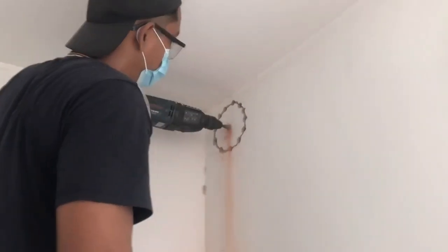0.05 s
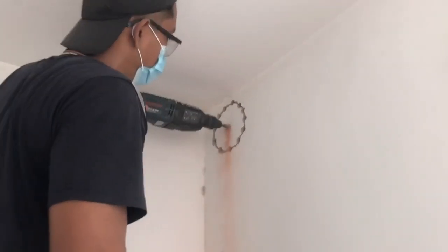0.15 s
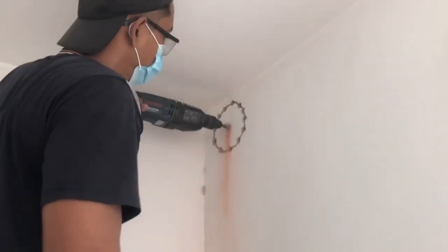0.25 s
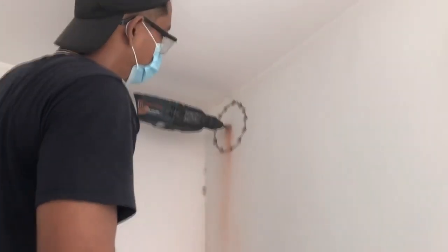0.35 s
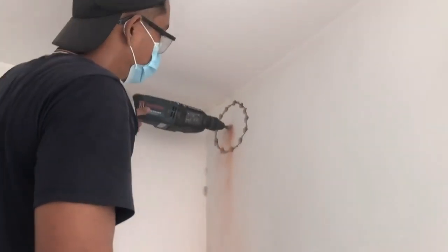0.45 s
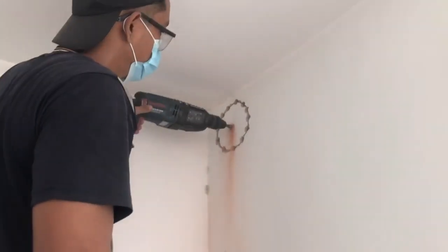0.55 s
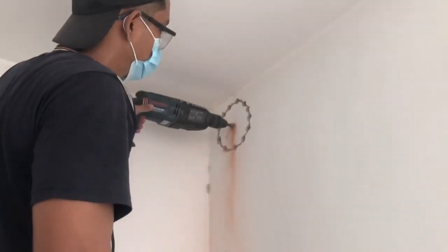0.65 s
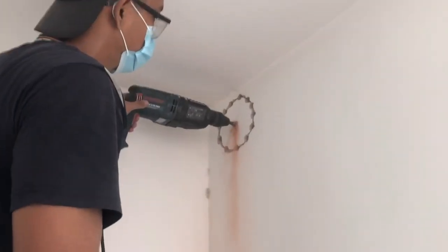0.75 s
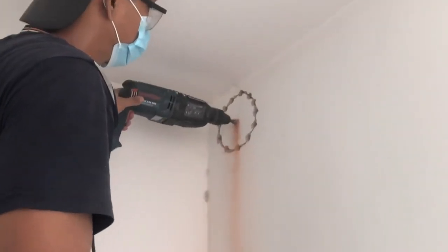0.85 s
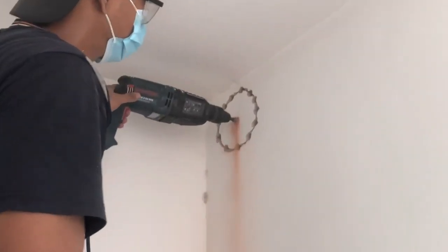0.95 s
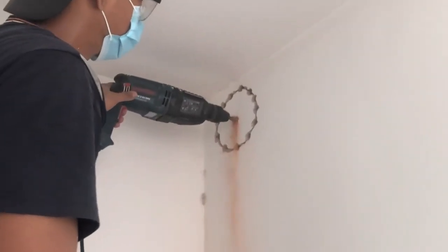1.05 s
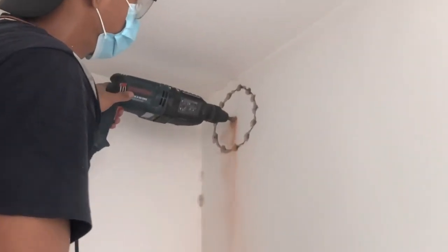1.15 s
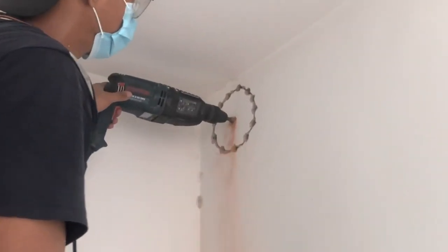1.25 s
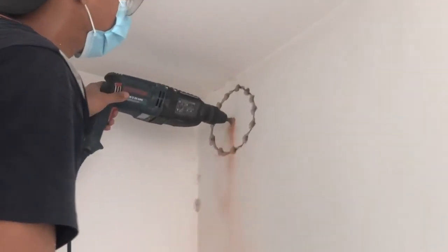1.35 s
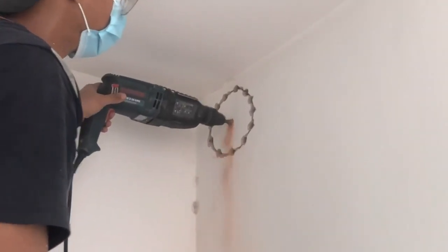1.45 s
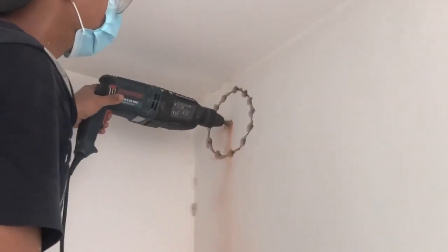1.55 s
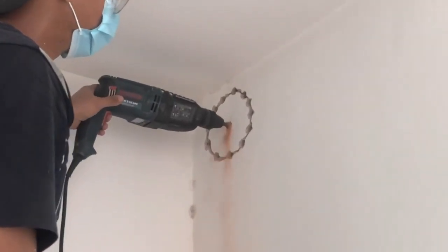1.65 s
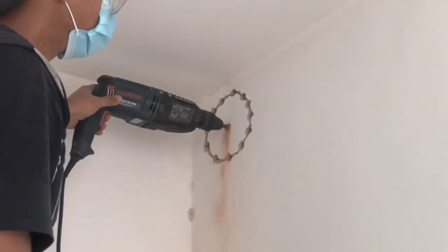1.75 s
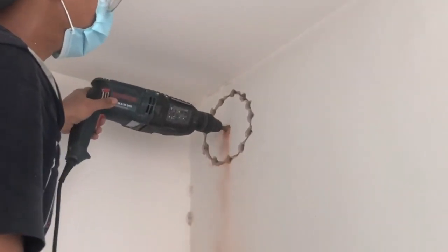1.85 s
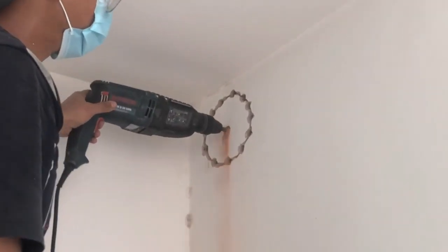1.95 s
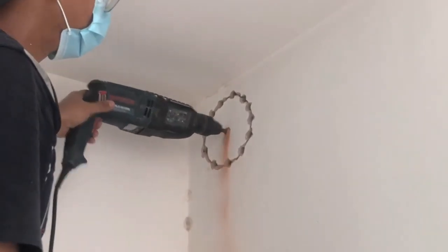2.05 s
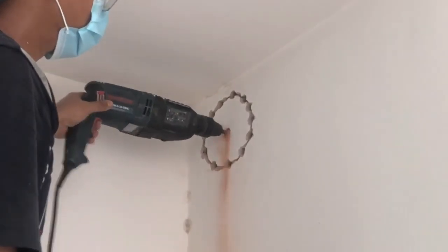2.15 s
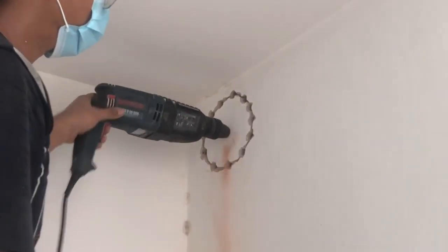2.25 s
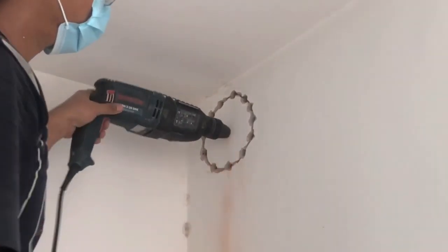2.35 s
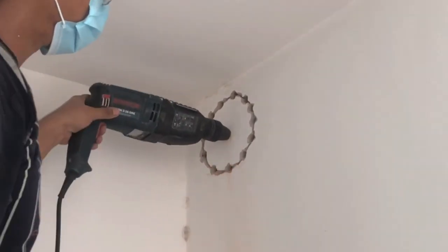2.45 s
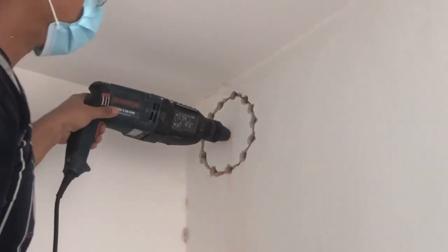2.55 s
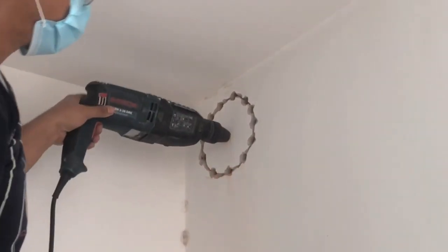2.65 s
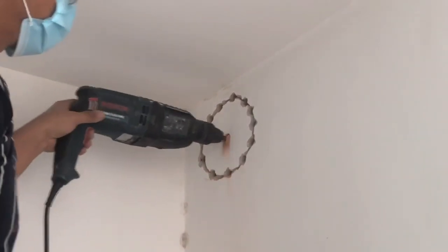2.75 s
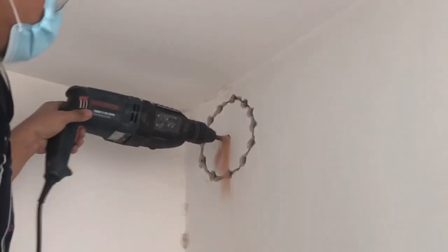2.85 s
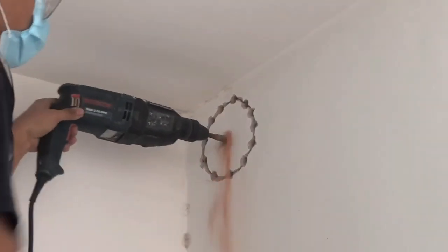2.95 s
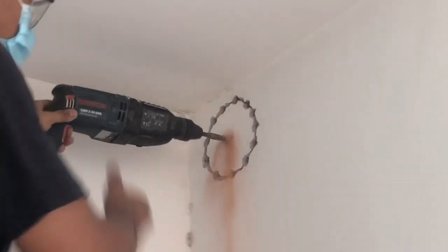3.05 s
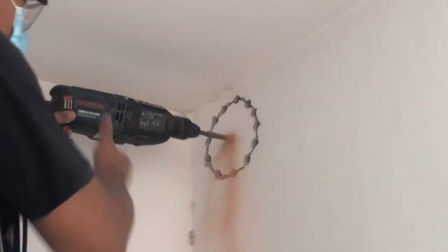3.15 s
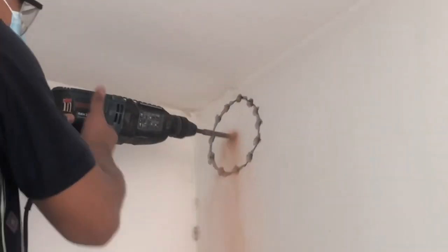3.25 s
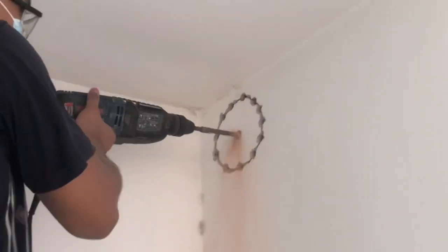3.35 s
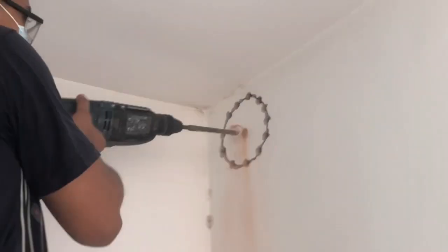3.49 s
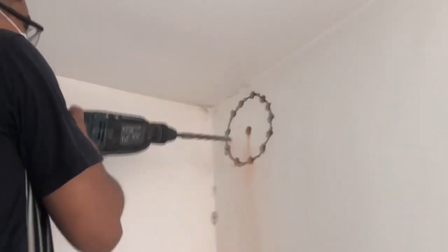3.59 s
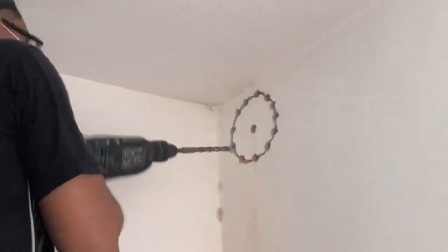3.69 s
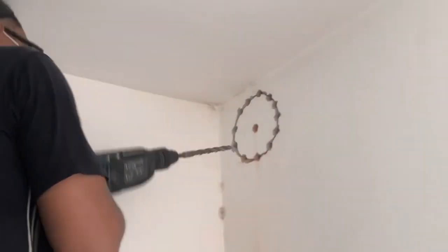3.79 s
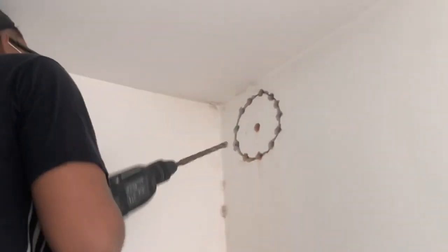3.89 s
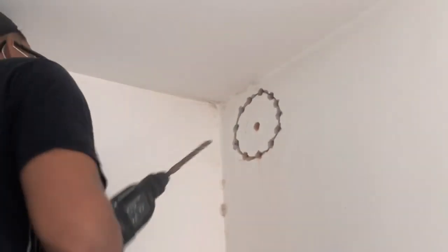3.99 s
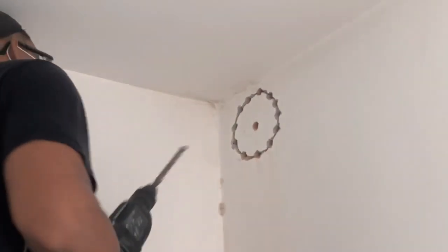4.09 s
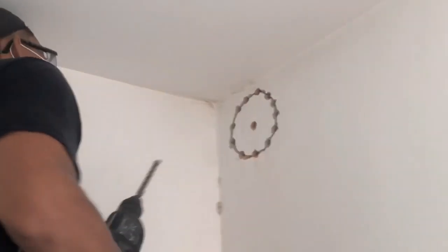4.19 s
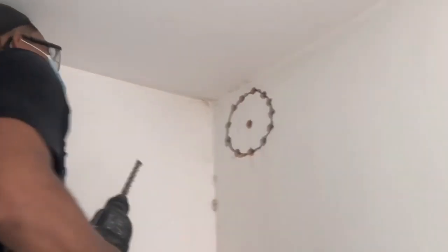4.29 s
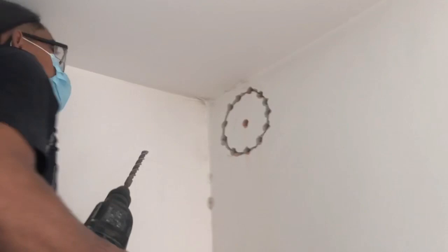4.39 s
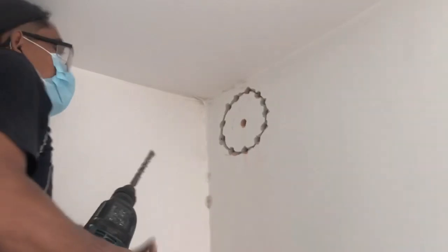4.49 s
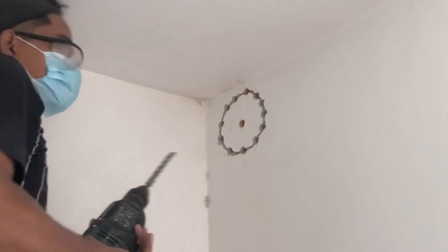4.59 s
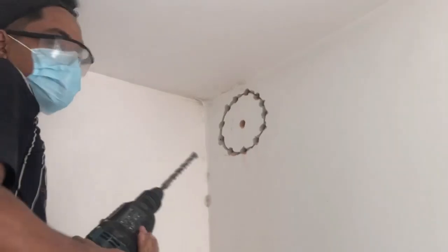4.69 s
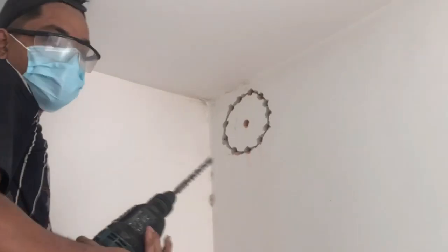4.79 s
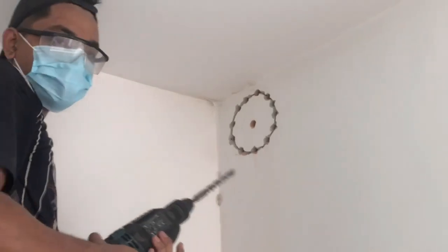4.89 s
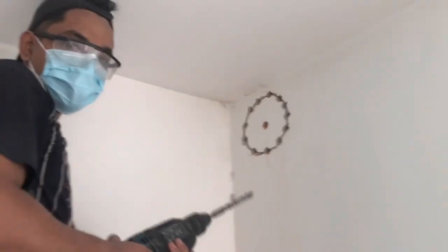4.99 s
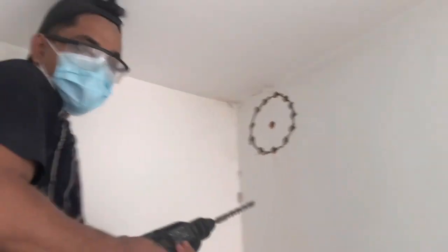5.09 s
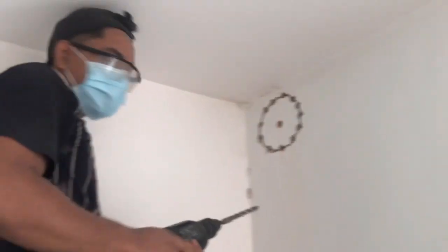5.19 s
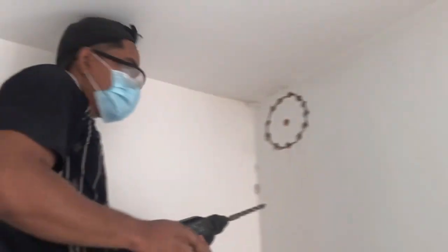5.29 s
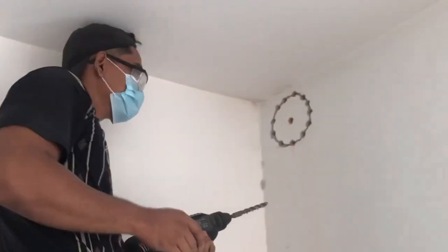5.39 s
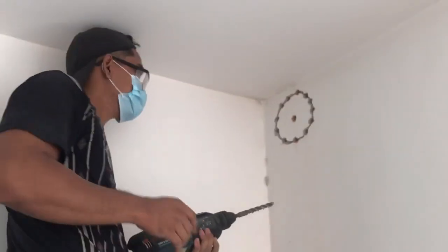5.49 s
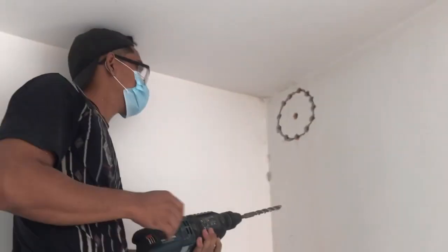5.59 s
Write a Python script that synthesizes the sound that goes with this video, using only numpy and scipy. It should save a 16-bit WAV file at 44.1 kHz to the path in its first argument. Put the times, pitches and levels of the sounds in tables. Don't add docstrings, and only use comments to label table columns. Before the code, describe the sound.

Loud, gritty hammer drilling from the start, about seventy blows a second, with booming wall and ringing steel. After two seconds the roar gives way to a smoother, higher motor whirr and brief scraping. The pitch then falls, the loose bit jingles and gears knock irregularly until they stop. Quiet clothing movement and one dull step follow in a hard-walled room, heard in mono at close to middle distance.

```python
import sys
import numpy as np
from scipy import signal
from scipy.fft import rfft, irfft, next_fast_len
from scipy.io import wavfile
from scipy.ndimage import uniform_filter1d

SR = 44100
rng = np.random.default_rng(int(sys.argv[2]) if len(sys.argv) > 2 else 0)


def magnitude_from_level(level_db):
    exponent = np.asarray(level_db, float) / 20
    return 10 ** exponent


def transcribe(u):
    v = np.clip(np.atleast_2d(u).T, -1, 1)
    q = np.round(v * 32767).astype(np.int16)
    wavfile.write(sys.argv[1], SR, q)


N = 248503

FIRST_BIND_S, THROUGH_S = 1.15, 2.13
RELEASE_S, STALL_S = 3.2, 4.78
LET_GO_S = 0.022
CASE_LOW_HZ = 600


def rms_one(x):
    return x / np.sqrt(np.mean(x ** 2) + 1e-20)


def after(start_s):
    return np.maximum(np.arange(N) / SR - start_s, 0)


def ramp(start_s, length_s):
    return np.clip(after(start_s) / length_s, 0, 1)


def spell(start_s, end_s):
    edge_s = .04
    return ramp(start_s, edge_s) * (1 - ramp(end_s - edge_s, edge_s))


def in_time(rows):
    s, *columns = np.transpose(rows)
    return [np.interp(np.arange(N) / SR, s, c) for c in columns]


def drift(rate):
    r = np.exp(-64 * np.pi * rate / SR)
    slow = signal.lfilter([1], [1, -2 * r, r * r], rng.standard_normal(N // 32 + 2002))[2000:]
    return np.interp(np.arange(N) / 32, np.arange(len(slow)), rms_one(slow))


def coloured(spectrum):
    hz, db = np.transpose(spectrum)
    size = next_fast_len(N)
    grid = np.maximum(np.arange(size // 2 + 1) * SR / size, 1)
    shape_db = np.interp(np.log(grid), np.log(hz), db, left=-70, right=-70)
    return rms_one(irfft(rfft(rng.standard_normal(size)) * magnitude_from_level(shape_db), size)[:N])


def ring(clicks, hz, t60):
    r, w = magnitude_from_level(-60 / (t60 * SR)), 2 * np.pi * hz / SR
    return signal.lfilter([0, np.sin(w)], [1, -2 * r * np.cos(w), r * r], clicks + 1e-18)


def fade(clicks, t60):
    return signal.lfilter([1], [1, -magnitude_from_level(-60 / (t60 * SR))], clicks + 1e-18)


def clicks_at(seconds, db):
    out = np.zeros(N)
    out[np.round(np.asarray(seconds) * SR).astype(int)] = magnitude_from_level(db)
    return out


def swelling(x, t60):
    swell = magnitude_from_level(-60 / (t60 * SR))
    return signal.lfilter([1 - swell], [1, -swell], x)


def jarring(seconds, db, t60):
    return swelling(fade(clicks_at(seconds, db), t60), .006) * rng.standard_normal(N)


def highpass(x, order, hz):
    return signal.sosfilt(signal.butter(order, hz, "high", fs=SR, output="sos"), x)


# time_s, crank_turns_hz
SPEED = [(0, 65), (.19, 68.8), (1.12, 69.7), (1.3, 58.9), (1.45, 57.1), (1.59, 66.4), (1.75, 67.8),
         (1.87, 59.9), (1.92, 61.5), (2.01, 66.6), (2.16, 67.6), (2.27, 74.5), (2.38, 78), (2.5, 80.6),
         (2.75, 82.3), (3.0, 81.5), (3.18, 80.9), (3.39, 66.3)]


def speed():
    last_s, last_hz = SPEED[-1]
    drag_hz = 44
    angle = np.arctan(last_hz / drag_hz) - .623 * after(last_s)
    coast = drag_hz * np.tan(np.maximum(angle, .02))
    return np.where(after(last_s) > 0, coast, in_time(SPEED)[0])


def crank():
    return np.cumsum(speed() * (1 + .002 * drift(15))) / SR


def loudness(db, power):
    return magnitude_from_level(db - 135 * after(STALL_S)) * (speed() / 82) ** power


def wavering(cycles, orders, wobble, flicker):
    n = len(cycles)
    total = 0
    for k, db in orders:
        level = magnitude_from_level(db) * (1 + flicker * drift(7)[:n]) * np.sqrt(2)
        total = total + level * np.sin(2 * np.pi * k * cycles + wobble * drift(12)[:n] + 7 * rng.random())
    return total


# pitch_hz, level_db per Hz
QUIET = [(35, -57.5), (60, -24.5), (108, -8.5), (154, -13.5), (190, -19.5), (290, -17), (615, -22.5),
         (4030, -32), (14700, -48), (16500, -53)]


def floor():
    again_s = 5.44
    moving = np.clip(1 - after(5.22) / 0.12, .12, 1)
    moving = moving + 0.58 * ramp(again_s - .04, 0.032) * magnitude_from_level(-25 * after(again_s))
    rustle = (after(4.9) > 0) * moving * magnitude_from_level(-59 + 2.0 * drift(24))
    rustle = rustle * coloured([(1500, -1), (4000, 0.5), (16000, -9.5)])
    return magnitude_from_level(-56 + 1.0 * drift(5)) * coloured(QUIET) + rustle


def boom(turns):
    boom_hz, t60_s, width_hz = 66.6, 0.51, 4
    noise = rms_one(ring(ring(rng.standard_normal(N), boom_hz, t60_s), boom_hz, t60_s))
    near = 1 / (1 + ((speed() - boom_hz) / width_hz) ** 2) ** .5
    driven_gain = magnitude_from_level(-43.5 + 1.5 * drift(4) - 33 * after(THROUGH_S))
    driven = driven_gain * near * 1.42 * np.sin(2 * np.pi * turns)
    return driven + np.hypot(loudness(-52, 3.0), magnitude_from_level(-66)) * noise


# start_s, peak_db
THUD = [
    (5.441, -37),
]
# pitch_hz, level_db, t60_s
BOARDS = [(75, -9, 0.46), (146, -5, 0.36), (235, 2, 0.56), (315, 2, .15)]


def footfall():
    step = clicks_at(*np.transpose(THUD))
    shake = step + magnitude_from_level(-30) * fade(step, 0.63) * rng.standard_normal(N)
    return sum(magnitude_from_level(db - 13.0) * ring(shake, hz, t60) for hz, db, t60 in BOARDS)


# start_s, peak_db, brightness_db
CLACKS = [(3.9, -9.5, -16), (3.989, -23, -2), (4.129, -13, -18), (4.392, -8, -25), (4.453, -3.5, -19),
          (4.527, -8, -22), (4.615, -3.5, -20.5), (4.644, -9, -22), (4.737, -2.5, -26), (4.778, -14.5, -38),
          (4.855, -18.5, -25), (4.956, -38, -12), (5.012, -29, -20), (5.064, -28.5, -22),
          (5.1134, -30.5, -19)]
# pitch_hz, level_db, t60_s
CASE = [(820, -8, .1), (1330, -9, .07), (1690, -1, .1), (1770, 0, .1), (2250, -6, .05), (2900, -5, .06),
        (3150, -5, .1), (4150, -10, .04), (5000, -14, .04)]


def clacks():
    s, db, bright_db = np.transpose(CLACKS)
    chance = rng.normal(0, 2, (len(s), len(CASE)))
    body = 0
    for k, (hz, mode_db, t60) in enumerate(CASE):
        jar = jarring(s, db - 33.5 + mode_db + chance[:, k], 0.064)
        body = body + ring(jar, hz, .24 * t60)
    puff = uniform_filter1d(fade(clicks_at(s + 0.00057, db - 10.5), 0.026), size=90)
    puff = puff * coloured([(900, -9), (2000, 1.5), (6000, -7.5)])
    crack = fade(clicks_at(s, db + bright_db), 0.048) * coloured([(5500, -7), (8500, 4), (11000, -1)])
    return highpass(body + puff, 4, CASE_LOW_HZ) + crack


# start_s, peak_db, struck_near_tip_db
RATTLE = [(3.6516, -16, 0), (3.674, -16, -11), (3.7181, -22, -16), (3.7428, -23, -14), (3.7666, -12, -4),
          (3.7918, -20, -11), (3.8432, -13, -21), (3.9275, -28, -6), (3.9589, -20, -12), (4.0217, -24, -4),
          (4.13, -6, -16), (4.2158, -21, 1), (4.361, -14.5, -2), (4.4215, -11.5, -2), (4.4761, -17, -7),
          (4.498, -23.5, 8), (4.575, -24, -1), (4.6149, -39.5, -13), (4.6473, -41, -3), (4.684, -19, -10)]
# pitch_hz, level_db, t60_s
BIT = [(4850, -11, .12), (7570, -10, .08), (7910, -10, .11), (9100, -14, .03), (11250, -5, .04),
       (11450, -1, .1), (11750, -2, .07), (12100, -3, .03), (12650, -5, .03), (15000, -4, .03),
       (15250, -1, .05), (15550, -3, .04)]


def rattle():
    s, db, low_db = np.transpose(RATTLE)
    chance = rng.normal(0, 1.5, (len(s), len(BIT)))
    out = 0
    for k, (hz, mode_db, t60) in enumerate(BIT):
        share_db = 0
        if hz < 10000:
            share_db = low_db + 8.5 + 3 * (hz < 5000)
        elif hz > 14000:
            share_db = -2
        jar = jarring(s, db - 32.5 + mode_db + share_db + chance[:, k], 0.12)
        out = out + ring(jar, hz, t60 / 2)
    return out + fade(clicks_at(s, db - 4.5), 0.019) * coloured([(4000, 4), (12000, -3), (16500, 6)])


# start_s, peak_db
PISTON = [(3.584, -16), (3.607, -13), (3.629, -33), (3.65, -21), (3.696, -32), (3.71, -16.5), (3.735, -15),
          (3.76, -21), (3.783, -32), (3.811, -25), (3.84, -32), (3.865, -16), (3.926, -16), (3.951, -18),
          (4.019, -25), (4.03, -32), (4.054, -24), (4.098, -18), (4.177, -16.5), (4.216, -17), (4.248, -19),
          (4.279, -19), (4.296, -21), (4.331, -19), (4.351, -17), (4.42, -18), (4.548, -19.5), (4.59, -29),
          (4.677, -24), (4.7, -35), (4.763, -33), (4.802, -38)]
# pitch_hz, level_db per Hz
KNOCK = [(500, -22), (800, 11), (1350, 5), (2800, 8), (5000, -3), (9000, -6), (16000, -22)]


def piston():
    return swelling(fade(clicks_at(*np.transpose(PISTON)), 0.055), .012) * coloured(KNOCK)


# pitch_hz, level_db, t60_s
FLUTES = [(737, -11, .05), (1150, -12, 0.083), (1546, 1, 0.064), (2120, 5.5, .03), (2470, -2, 0.023),
          (2770, -4, 0.044)]


def scraping():
    grit = rng.standard_normal(N)
    flutes = 0
    for hz, db, t60 in FLUTES:
        flutes = flutes + magnitude_from_level(db + 4.7 * drift(14.0)) * ring(grit, hz, t60) / np.sqrt(t60)
    song = magnitude_from_level(-44) * spell(THROUGH_S, RELEASE_S) * rms_one(ring(grit, 15480, .1))
    return magnitude_from_level(-21) * spell(2.6, 3.42) * rms_one(flutes) + song


def line_gain(loaded_db, free_db, sag_db, drop_db, power):
    settled_s = 2.48
    freed = 1 - np.exp(-after(THROUGH_S) / .11)
    sag_s = np.minimum(after(settled_s), RELEASE_S - settled_s)
    db = loaded_db + (free_db - loaded_db) * freed - sag_db * sag_s - drop_db * after(RELEASE_S)
    return loudness(db, power)


# multiple_of_armature, level_db
HUM = [(1, 0), (2, -8)]
MESH = [(4, 0)]
CRANK_GEAR = [(1.67, 3), (2.11, 0), (3.42, 1), (6.97, -4), (7.18, 4.5), (7.39, -5), (7.6, -3), (8.7, -6),
              (10, -4)]
BARS = [(18, -4), (20, 0), (22, -1)]
# time_s, level_db
MESH_SLACK = [(0, 0), (2.38, -5), (2.45, 1), (2.8, 3), (3.03, 3), (3.12, -4), (3.38, -4), (3.5, 2),
              (3.7, 1), (4.12, -1), (4.28, -10)]
# multiple_of_armature, start_s, end_s, level_db
TEETH = [(6.85, 3.5, 3.7, -2), (6.85, 3.7, 3.84, 3), (28.1, 3.3, 3.6, -6), (13.8, 3.62, 3.88, 1),
         (14.2, 3.84, 4.17, 1), (13.75, 3.95, 4.2, -5), (23.85, 3.74, 3.9, -4), (23.85, 3.88, 4.02, -8),
         (23.85, 4.0, 4.28, -2), (21.1, 4.12, 4.38, -3), (35.4, 4.26, 4.48, -4), (32.9, 4.34, 4.55, -9),
         (10.4, 3.65, 3.9, -6), (20, .68, 1.16, -1), (20, 1.55, 2.0, -1), (20, 2.11, 2.32, 2),
         (22, 2.5, 3.0, 1), (20, 3.02, 3.32, 2), (18, 3.0, 3.2, 1), (8.0, 2.36, 2.8, 5), (7.5, 2.7, 3.0, 3),
         (6.7, 3.1, 3.4, 3)]


def whine(turns):
    spin = 4.74 * turns
    hum = line_gain(-60, -29, 6, 55, 1) * wavering(spin, HUM, .4, .2)
    mesh = line_gain(-38, -25, 8, 0, .9) * wavering(spin, MESH, .5, .2)
    crank_gear = line_gain(-70, -27.5, 20, 60, 1) * wavering(spin, CRANK_GEAR, .75, .2)
    bars = line_gain(-40, -32.5, 0, 30, 1) * wavering(spin, BARS, 1.1, .2)
    meshes = mesh * magnitude_from_level(in_time(MESH_SLACK)[0]) + crank_gear + bars
    teeth = np.zeros(N)
    for k, start, end, db in TEETH:
        span = slice(round(start * SR), round(end * SR))
        teeth[span] += spell(start, end)[span] * wavering(spin[span], [(k, -33.5 + db)], 2.2, .35)
    teeth = teeth * (1 + .4 * np.cos(2 * np.pi * turns))
    return hum + teeth + highpass(meshes, 4, CASE_LOW_HZ)


# pitch_hz, level_db per Hz
GEARS = [(350, -23.5), (600, -16.5), (638, -13.5), (685, -3.5), (1040, -1), (1580, 3), (2330, 2),
         (2710, 1.5), (3670, -3.5), (5000, -3.5), (6500, -35), (11000, -120)]
# pitch_hz, level_db per Hz
FAN = [(2060, 0), (3500, 1), (7820, -2.5), (8570, -2), (15200, -12), (16200, -22.5), (16500, -64.5)]
# pitch_hz, level_db per Hz
HOUSING = [(24, -68), (40, -68.5), (70, -5.5), (108, -22.5), (178, -79), (223, -22), (272, -16.5),
           (392, 6.5), (444, 5), (638, 8), (800, -1), (1040, -37), (1760, -120)]
# pitch_hz, level_db, t60_s
ROOM_MODES = [(244.6, -4, 0.25), (339.4, 0.5, 0.3)]


def motor(turns):
    throb = 1 + .21 * np.cos(2 * np.pi * turns) + 0.049 * np.cos(2 * np.pi * turns / 4.2)
    teeth = rng.standard_normal(N)
    case = 0
    for hz, db, t60 in CASE:
        case = case + magnitude_from_level(db / 2 + 3.0 * drift(4)) * ring(teeth, hz, .3 * t60) / np.sqrt(t60)
    growl = (coloured(GEARS) + magnitude_from_level(-11.5) * rms_one(case)) * throb * magnitude_from_level(0.47 * drift(11.0))
    growl = loudness(-14.5, 1.21) * growl

    blades_and_bearings = np.hypot(loudness(-12, 2.53), loudness(-27, 0.59))
    hiss = blades_and_bearings * magnitude_from_level(0.93 * drift(27)) * coloured(FAN)

    hum = rms_one(sum(magnitude_from_level(db) * ring(teeth, hz, t60) for hz, db, t60 in ROOM_MODES))
    current_db = 6 * (1 - ramp(RELEASE_S - .1, 0.185))
    cave_in_db = 11 * np.exp(-after(THROUGH_S) / 0.025)
    linger_db = 66 * np.minimum(after(STALL_S), .18)
    rumble_gain = loudness(-34, .85) * magnitude_from_level(current_db + cave_in_db + 1.0 * drift(9) + linger_db)
    rumble = rumble_gain * (coloured(HOUSING) + magnitude_from_level(-9.5) * hum)

    coast_hum = loudness(-47.5, 0.98) * ramp(RELEASE_S, .2) * rms_one(ring(teeth, 231.2, 0.44))
    return ramp(THROUGH_S - .04, LET_GO_S) * (growl + hiss + rumble + coast_hum)


# time_s, level_db
PUSH = [
    (0, -1),
    (.4, -1),
    (1.0, -0.5),
    (1.45, -1.5),
    (1.65, 1),
    (1.9, -0.5),
    (2.13, -0.5),
]


def contact():
    return magnitude_from_level(in_time(PUSH)[0]) * (1 - ramp(THROUGH_S, LET_GO_S)) ** 2


# pitch_hz, level_db
WALL_TONE = [(60, -11.5), (140, -23), (207, -9), (232, -0.5), (277, -18.5), (335, -7.5), (410, -2),
             (484, 0), (555, -5.5), (625, -2.5), (695, -1.5), (762, 2.5), (830, -12.5), (970, -4.5),
             (1100, -11), (1315, -5), (1450, -26), (1665, 0.5), (1850, -22), (2080, -9.5)]


def blow_tones(turns):
    hz, db = np.transpose(WALL_TONE)
    turns = turns[:round((THROUGH_S + LET_GO_S) * SR)]
    rate = np.gradient(turns) * SR
    bound = after(FIRST_BIND_S)[:len(turns)] > 0
    tones = 0
    for k in range(2, 31):
        wobble = .15 + .012 * k * bound
        tones = tones + magnitude_from_level(np.interp(k * rate, hz, db)) * wavering(turns, [(k, 0)], wobble, .2)
    gain = magnitude_from_level(-27 - 2.5 * ramp(FIRST_BIND_S, 0.13) + 1.0 * drift(1.3))
    return gain * contact() * np.pad(tones, (0, N - len(turns)))


# pitch_hz, width_hz, level_db
WALL = [(230, 62, -7.5), (345.5, 20, 6), (533, 43, -22.5), (680, 130, 7), (1302, 74, 9.5), (1990, 300, -11)]
# pitch_hz, level_db per Hz
BRICK = [(88, -53), (150, -49.5), (210, -29.5), (293, -28), (479, -4.5), (1050, -4.5), (2130, -1),
         (6500, -9), (9500, -11), (11800, -8), (13800, -12.5), (15600, -12), (16500, -43)]
# pitch_hz, level_db per Hz
GRIT = [(1400, -8), (2050, -5), (3000, 1.5), (4500, -4), (7000, -9.5)]
# pitch_hz, level_db, t60_s
CRACK = [(1500, -3, .012), (2060, 0, .02), (2900, -1, .01), (3900, -4, .012), (5200, -6, .012)]
# time_s, level_db
SHANK = [(0.0, -13.5), (0.07, -23), (0.93, -28), (1.34, -24.5), (1.36, -17.5), (1.4, -27), (1.66, -24.5),
         (1.7, -28.5), (2.13, -19.5)]


def hammering(turns):
    blows = np.diff(np.floor(turns), prepend=0) * (1 + .2 * rng.standard_normal(N))
    rebounds = (rng.random(N) < 700 / SR) * magnitude_from_level(-13.0 + 7.2 * rng.standard_normal(N))
    rebounds = rebounds * rng.choice([-1, 1], N)

    shove = blows * np.tanh(rng.standard_normal(N)) + rebounds
    wall = sum(magnitude_from_level(db) * np.sqrt(width) * ring(shove, hz, 2.5 / width) for hz, width, db in WALL)
    wall_db = -26.5 + 2 * ramp(FIRST_BIND_S, .1) + 2.0 * drift(5.6)

    crush = coloured(BRICK) * (.85 + fade(blows, .025)) * magnitude_from_level(1.2 * drift(25))
    brick_db = -12 + 1.2 * drift(48)
    grit = rms_one(coloured(GRIT) * (.5 + fade(blows, 0.089)))
    grit_db = -20.5 - 2 * ramp(FIRST_BIND_S + 0.035, .1)
    crack = rms_one(sum(magnitude_from_level(db) * ring(blows, hz, t60) for hz, db, t60 in CRACK))

    chatter = 0.23 + fade(blows, 0.017)
    steel = 0
    for hz, db, t60 in BIT:
        jar = chatter * rng.standard_normal(N)
        steel = steel + magnitude_from_level(db + 1.7 * drift(11.0)) * ring(jar, hz, .42 * t60)
    steel_db = -18.4 + in_time(SHANK)[0] - np.mean(SHANK, axis=0)[1] + .7 * drift(8.0)

    brick = magnitude_from_level(brick_db) * rms_one(crush) + magnitude_from_level(grit_db) * grit
    return contact() * (magnitude_from_level(wall_db) * rms_one(wall) + brick + magnitude_from_level(-24.5) * crack
                        + magnitude_from_level(steel_db) * rms_one(steel))


def room(x):
    t60_s, tail_db, wall_cut_hz = 0.67, -1, 2460
    t = np.arange(SR) / SR
    tail = rng.standard_normal(SR) * magnitude_from_level(-60 * t / t60_s) * (t > .005)
    dull = np.exp(-2 * np.pi * wall_cut_hz / SR)
    tail = signal.lfilter([1 - dull], [1, -dull], tail / np.sqrt(np.sum(tail ** 2)))
    return x + magnitude_from_level(tail_db) * signal.fftconvolve(x, tail)[:N]


def scene():
    turns = crank()
    loose_parts = clacks() + rattle() + piston() + scraping()
    drill = magnitude_from_level(-2.5) * room(loose_parts + motor(turns) + hammering(turns))
    drill = highpass(drill, 8, 228.7)
    mono = floor() + boom(turns) + footfall() + whine(turns) + blow_tones(turns) + drill
    return np.array([mono, mono])


def roll_off(x):
    return signal.sosfilt(signal.butter(12, 16850, fs=SR, output="sos"), x)


def record(dry):
    soft = .95 * dry / np.sqrt(np.sqrt(.95 ** 4 + (dry * dry) ** 2))
    cut = signal.sosfilt(signal.ellip(10, .5, 70, 15780, fs=SR, output="sos"), soft)
    return roll_off(cut)


dry = scene()
out = record(dry)
transcribe(out)
```